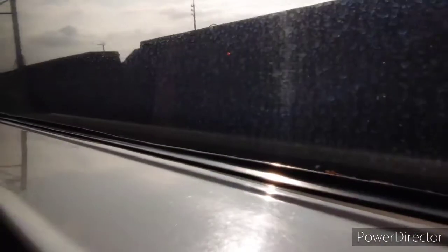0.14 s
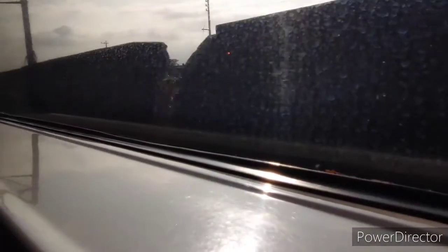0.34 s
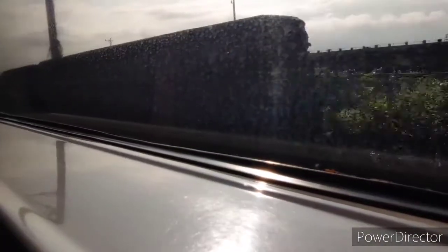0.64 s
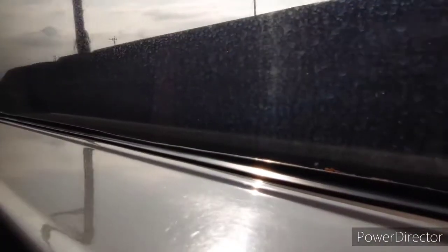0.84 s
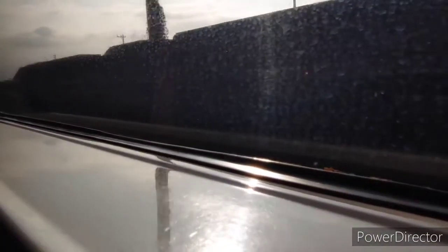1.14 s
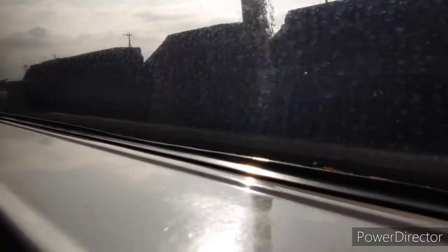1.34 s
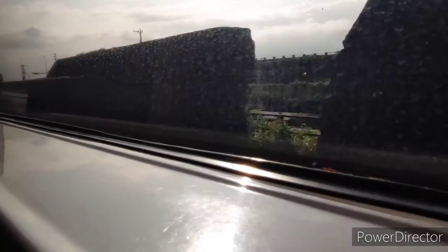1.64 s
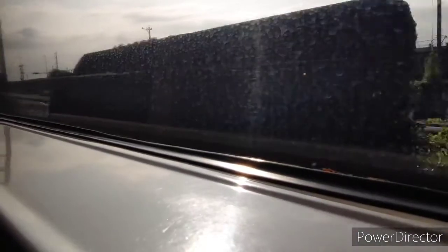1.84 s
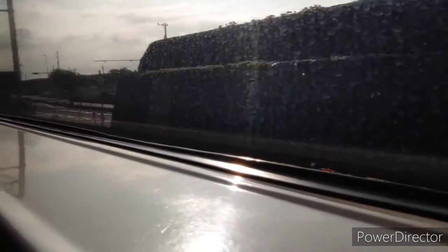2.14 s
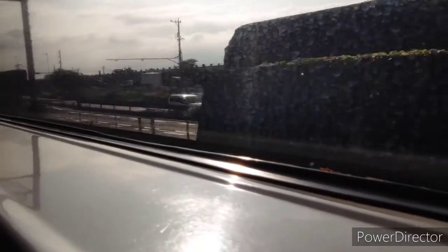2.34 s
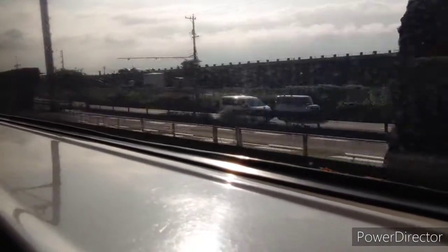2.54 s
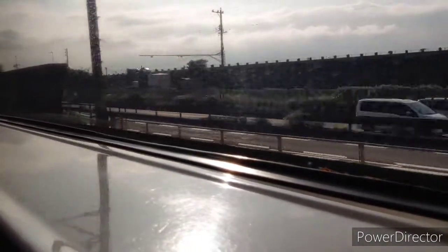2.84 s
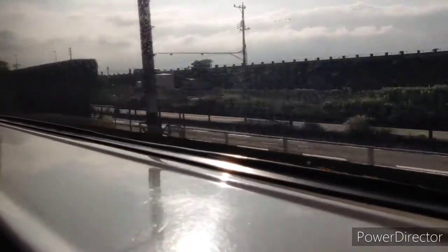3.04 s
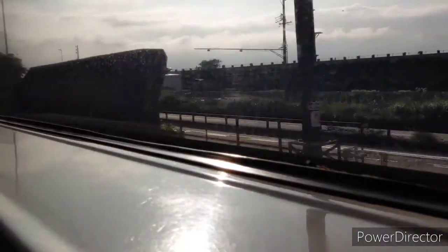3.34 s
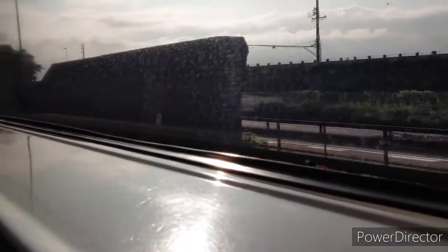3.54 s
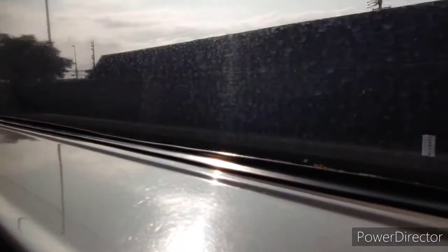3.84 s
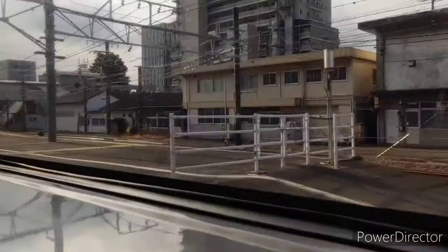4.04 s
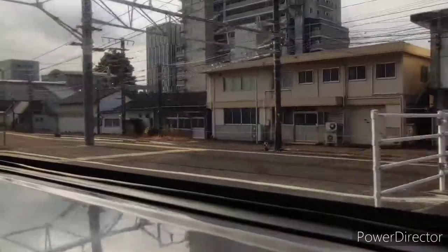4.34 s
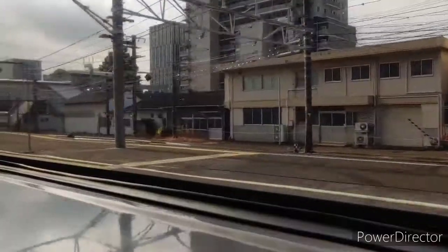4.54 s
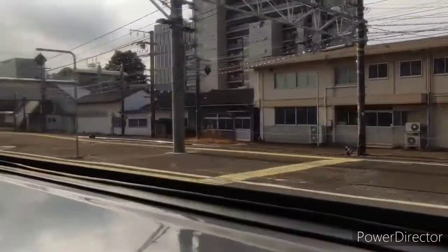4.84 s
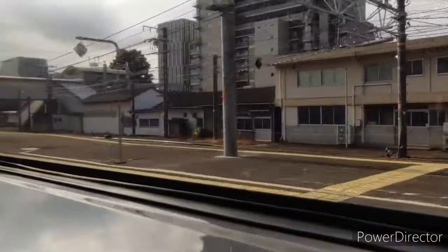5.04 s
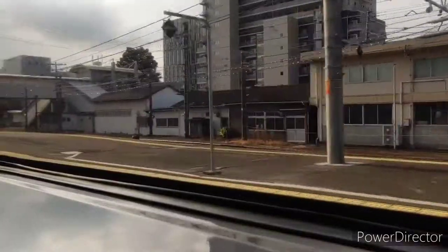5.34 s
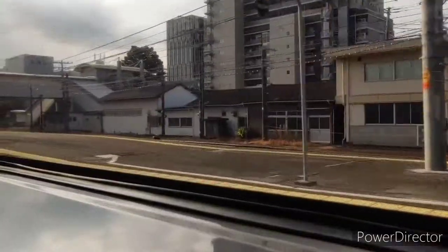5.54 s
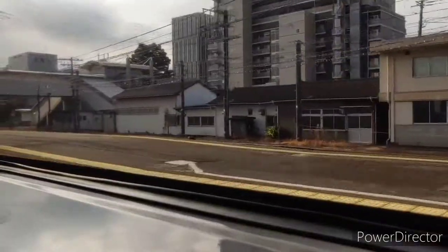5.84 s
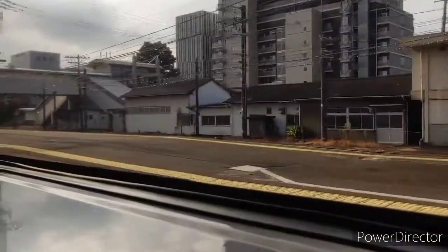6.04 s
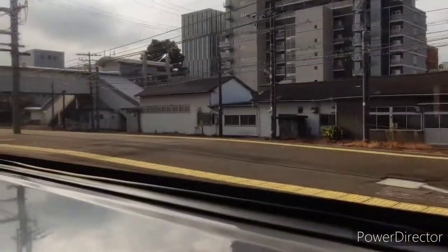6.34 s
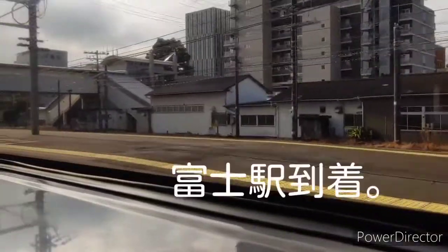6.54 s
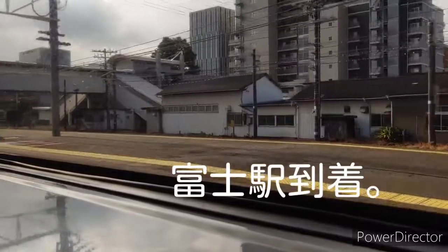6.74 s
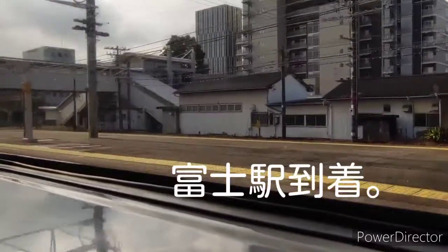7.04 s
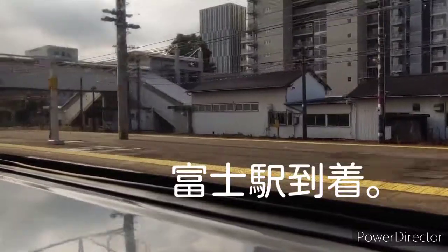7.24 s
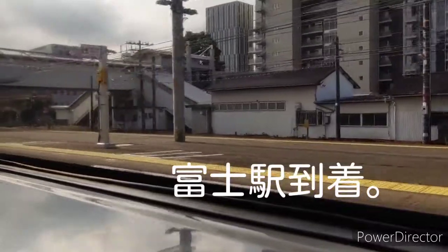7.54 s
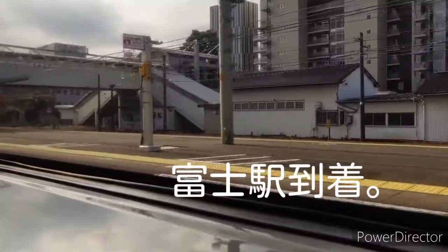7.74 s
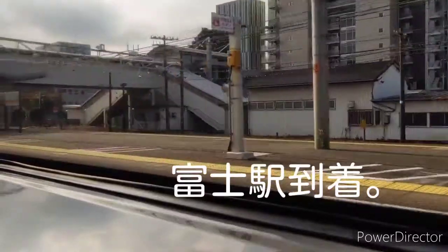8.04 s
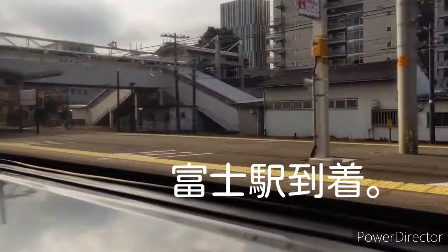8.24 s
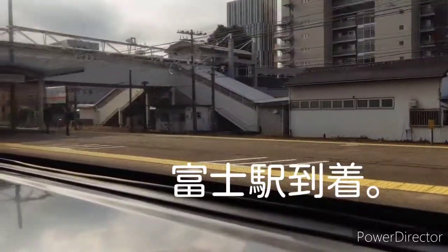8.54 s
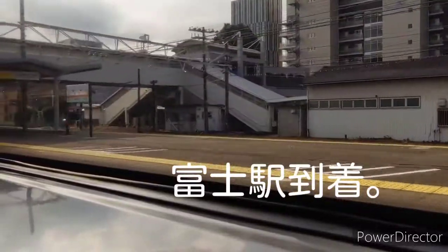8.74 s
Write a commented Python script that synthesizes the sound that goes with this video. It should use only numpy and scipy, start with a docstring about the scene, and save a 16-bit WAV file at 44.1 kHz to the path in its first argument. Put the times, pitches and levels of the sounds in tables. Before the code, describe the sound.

A microphone by a train window picks up heavy bass-rich rolling noise at speed, swelling and dipping past walls, with irregular soft rail-joint thumps and an early gust of hiss. A hard cut leaves a blink of silence. Then a calmer, slowing train rises, with low rumble, layered electric whine gliding downward and swelling unevenly, and a few faint bumps until the end.

```python
"""Inside a carriage of an electric train, a phone by the window. At speed, shaped noise makes the floor
rumble, rail roar and air hiss, narrow resonances the hums and a brief wheel ring, decaying sines the
thuds and ticks, and a gliding tone with fuzz one squeak. After a hard cut and a moment of silence the
braking train fades in; its gear and motor tones are sines that sink with the speed, swelling wherever
they cross a resonance of the carriage body."""
import sys
import numpy as np
from scipy import signal
from scipy.io import wavfile
from scipy.ndimage import uniform_filter1d

SR = 44100
rng = np.random.default_rng(int(sys.argv[2]) if len(sys.argv) > 2 else 0)


def ratio(d):
    """dB to gain"""
    e = np.asarray(d, float) / 20
    return 10 ** e


def put_to_file(sound):
    """Save the sound as 16-bit audio at rate SR, in the file named by the first command-line argument."""
    columns = np.atleast_2d(sound).T  # one column per channel
    safe = np.clip(columns, -1, 1)
    whole_steps = np.round(safe * 32767)
    wavfile.write(sys.argv[1], SR, whole_steps.astype(np.int16))


N = 391605
T = np.arange(N) / SR
CUT_S, FADE_START_S = 4.0405, 4.105  # end of the fast part, start of the braking part


def evened(x):
    """Scales to rms 1."""
    return x / np.sqrt(np.mean(x ** 2) + 1e-20)


def read(points, hz):
    """Reads a spectrum on a log frequency axis."""
    f, value = np.transpose(points)
    return np.interp(np.log(hz + 1), np.log(f + 1), value)


def panned(x, db):
    """Left and right channels, the left db above the right, their mean unchanged."""
    return np.array([x * ratio(db), x]) * 2 / (1 + ratio(db))


def split(x, hz):
    """The parts below and above hz."""
    low = signal.sosfiltfilt(signal.butter(2, hz, fs=SR, output="sos"), x)
    return low, x - low


def follow(level, share):
    """The surges of a level about its median, scaled in dB by share."""
    return (level / np.median(level)) ** share


def resonate(x, hz, width):
    """A one-pole resonance: shifts hz down to zero, smooths, and shifts back."""
    turn = np.exp(2j * np.pi * np.cumsum(hz * np.ones(len(x))) / SR)
    r = np.exp(-np.pi * width / SR)
    return 2 * (turn * signal.lfilter([1 - r], [1, -r], x / turn)).real


def fuzz_band(count, hz, width):
    """Noise through the same resonance twice: a narrow fuzzy band of rms 1."""
    once = resonate(rng.standard_normal(count), hz, width)
    return evened(resonate(once, hz, width))


def fade(t, power):
    """Sets in faintly, then after a soft start rises as a power of the time, fast at first."""
    first_step, soft_start_s, full_s = .08, 0.092, 2.4
    u = np.maximum(t - FADE_START_S, .004)
    return np.minimum(u / full_s, 1) ** power * (1 - (1 - first_step) * np.exp(-u / soft_start_s))


# likeness of the two channels: (f/Hz, left-right correlation)
LIKENESS = [(60, 0.98), (80, 1), (110, 1), (140, 0.98), (190, 1), (260, 0.94), (340, 0.74), (460, 1),
            (610, 0.89), (820, 0.39), (1100, -0.58), (1470, -0.16), (1960, 0.078), (2620, 0.045),
            (3510, -0.077), (4690, 0.05), (6270, -0.072), (8390, -0.085), (11200, -0.42), (15000, 0.2)]
# phase by which the left port leads: (f/Hz, phase/rad)
LEFT_LEAD = [(100, 0), (300, 0.44), (700, 0.31), (1100, 0.033)]
# colour of the left port against the right: (f/Hz, level/dB)
PORT_COLOUR = [(60, 1.5), (200, -1), (350, -0.5), (700, -7), (1100, -10.5), (1600, -4), (2400, 3.5),
               (3400, -1.5), (5000, 1.5), (6000, 1.5), (6700, 22.5), (7300, 2), (8500, 0.5)]


def noise(colour, patchy_db, flicker_db, count, size):
    """Stereo noise with drifting patches and a flicker shared by all pitches; channel mean at rms 1."""
    frames, hz = count * 4 // size + 5, np.fft.rfftfreq(size, 1 / SR)
    a, b, c, d, patches = rng.standard_normal((frames, len(hz), 5)).T
    patches = uniform_filter1d(patches, size=9, axis=0)
    patches = evened(uniform_filter1d(patches, size=9, axis=1))
    flicker = evened(uniform_filter1d(rng.standard_normal(frames), size=7))
    same = np.clip(read(LIKENESS, hz), -1, 1)[:, None]
    shared, own = a + 1j * b, c + 1j * d
    left = shared * np.exp(1j * read(LEFT_LEAD, hz))[:, None]
    right = same * shared + np.sqrt(1 - same ** 2) * own
    ports = panned(ratio(read(colour, hz)), read(PORT_COLOUR, hz))[:, :, None]
    z = np.array([left, right]) * ports * ratio(patchy_db * patches + flicker_db * flicker)
    out = signal.istft(z, nperseg=size, noverlap=size * 3 // 4)[1][:, :count]
    return out / out.mean(0).std()


def floor_rumble(level, colour, deep_share):
    """Low noise through the floor; the deep bass follows only its own share of the surges."""
    deep, floor = split(noise(colour, patchy_db=0.44, flicker_db=1.0, count=len(level), size=2048), hz=85)
    return level * floor + deep * np.median(level) * follow(level, deep_share)


# the roar brightens beside the walls: (t/s, level of its upper middle/dB)
BRIGHTENING = [(0, 0), (.6, 0), (1.0, 0), (1.6, 0), (2.2, 0), (2.6, 1.5), (3.0, 3), (3.3, 2.5), (3.5, 0),
               (4.03, 0)]


def rail_roar(level, colour, share, flicker_db, t):
    """Mid-range rolling noise; its top edge follows only its own share of the surges."""
    roar = noise(colour, patchy_db=0.96, flicker_db=flicker_db, count=len(t), size=1024)
    body, edge = split(roar, hz=1390)
    dull, bright = split(body, hz=600)
    body = dull + bright * ratio(np.interp(t, *np.transpose(BRIGHTENING), right=0))
    return level * body + edge * np.median(level) * follow(level, share)


# the sinking speed: (t/s, gear mesh f/Hz)
GEAR_MESH = [(4.1, 320.4), (5.5, 295.2), (6.1, 285.4), (6.7, 273), (7.2, 265.2), (7.8, 255), (8.3, 246.4),
             (8.88, 237)]
# tones tied to the speed: (multiple of the gear mesh)
MESH_MULTIPLES = [1, 1.281, 1.45, 2, 2.565, 2.92, 3.01, 3.26, 3.845, 3.932, 4.015, 5.015, 6.03]
# one row a multiple, before body and fade: (settled level/dB, settling t/s, level before relative to it/dB)
TONE_LEVELS = [(0, 4.2, 0), (-8, 7.5, 8), (-4, 8.3, -17), (0, 4.2, 0), (-11, 4.2, 0), (-8, 6.8, -4),
               (-7, 8.5, -5), (0, 5.6, -9), (-14, 6.3, 10), (3, 7.6, -11), (-5, 6.8, -3), (-2, 6.8, -9),
               (-3, 4.2, 0)]
# resonances of floor and walls: (f/Hz)
BODY_PITCHES = [238, 243.5, 253.5, 267.5, 274, 283, 290, 312, 354.5, 365, 377, 391, 403, 605, 722, 755, 778,
                808, 840, 868, 920, 962, 1000, 1040, 1082, 1126, 1168, 1192, 1222, 1300, 1356, 1647, 1815]
# one row a resonance: (width/Hz, level/dB)
BODY_PEAKS = [(7, -24), (8.5, -21), (9, -24.5), (5.5, -23.5), (8.5, -24.5), (10, -25), (8, -28.5),
              (16, -42), (12, -36), (10, -35), (10, -32), (10, -40), (12, -37), (40, -48), (16, -35),
              (14, -38), (24, -39.5), (24, -45), (14, -39.5), (20, -40), (26, -48), (22, -46), (34, -44),
              (30, -49), (30, -42), (20, -48), (20, -54), (12, -50), (16, -54), (18, -55), (14, -52),
              (24, -54), (26, -59)]
# response between the resonances: (f/Hz, level/dB)
BODY_FLOOR = [(240, -44), (500, -50), (900, -55), (1600, -66)]


def whine():
    """Clean, separately wavering sines on multiples of the gear mesh swell at each body resonance."""
    settle_s, waver_db, fade_power, pan_db = 0.71, 1.4, 0.33, -5
    start = round(GEAR_MESH[0][0] * SR)
    t, out = T[start:], np.zeros((2, N))
    turn = 2 * np.pi * np.cumsum(np.interp(t, *np.transpose(GEAR_MESH))) / SR
    slow = t[::200]  # levels are worked out on a coarse time grid
    mesh_hz = np.interp(slow, *np.transpose(GEAR_MESH))
    steps = np.arange(t[0], t[-1] + .1, .04)
    chance = rng.standard_normal((len(MESH_MULTIPLES), len(steps)))
    for multiple, (full_db, full_s, before_db), row in zip(MESH_MULTIPLES, TONE_LEVELS, chance):
        hz = multiple * mesh_hz
        tone_db = full_db + before_db * np.clip((full_s - slow) / settle_s, 0, 1)
        power = ratio(read(BODY_FLOOR, hz)) ** 2
        for peak_hz, (width, db) in zip(BODY_PITCHES, BODY_PEAKS):
            power = power + (ratio(db) / (1 + (2 * (hz - peak_hz) / width) ** 4)) ** 2
        waver = waver_db * np.interp(slow, steps, row)
        level = np.sqrt(power) * ratio(tone_db + waver) * fade(slow, fade_power)
        sine = np.sqrt(2) * np.sin(multiple * turn + 2 * np.pi * rng.random())
        out[:, start:] += panned(np.interp(t, slow, level) * sine, read(PORT_COLOUR, hz.mean()) + pan_db)
    return out


# wheels over rail joints: (t/s, level before rise and decay/dB, ring f/Hz)
JOINT_THUDS = [(0.025, -5.5, 198), (0.061, -4.5, 138.4), (0.172, -8.5, 169), (.31, -9.5, 191.5),
               (0.469, -5, 191), (0.476, -6.5, 472), (0.496, -10.5, 171), (0.6, -11.5, 203.6),
               (.61, -11.5, 385), (0.711, -14, 150), (0.959, -8.5, 143), (1.024, -14.5, 165),
               (1.798, -12.5, 636), (1.805, -6.5, 150.7), (1.879, -13.5, 658), (1.889, -14.5, 174),
               (1.929, -13, 210), (1.99, -16.5, 510), (2.187, -14.5, 627), (2.235, -6.5, 174),
               (2.275, -4.5, 216), (2.316, -8, 168), (2.705, -5, 175), (2.74, -11, 166.5),
               (2.855, -10.5, 177.4), (2.89, -8.5, 167.4), (3.03, -13, 616), (3.058, -12.5, 146),
               (3.105, -17, 201), (3.299, -9.5, 186.5), (3.351, -11, 167), (6.129, -17.5, 174),
               (6.352, -11, 130.5), (6.358, -19, 309), (4.81, -29.5, 470), (8.379, -26, 605)]


def thuds():
    """A soft blow rings the floor for roughly a tenth of a second, shorter when high."""
    rise_cycles = 2.24
    out, t = np.zeros(N + SR), np.arange(SR // 5) / SR
    for s, db, hz in JOINT_THUDS:
        rise = np.sin(np.pi / 2 * np.minimum(t * hz / rise_cycles, 1)) ** 2
        ring = np.sin(2 * np.pi * (hz * t + rng.random()))
        ring += 0.12 * np.sin(2 * np.pi * (1.37 * hz * t + rng.random()))
        t60 = 0.051 + 20.3 / (hz + 120)  # seconds
        out[round(s * SR):][:len(t)] += ratio(db - 60 * t / t60) * rise * ring
    return panned(out[:N], -.8)


# loose trim ticking: (t/s, crack level/dB, left-right level/dB, knock level/dB)
TRIM_TICKS = [(1.1373, -21.5, -8, -9), (2.2373, -20, -10, -11), (4.1662, -55, 3, -50), (4.287, -55, 0, -50),
              (4.795, -57, 7, -50)]
# rings of the crack: (f/Hz, relative level/dB, t60/s)
CRACK_MODES = [(2300, -0.5, .005), (3400, -7.5, .006), (4440, 6.5, 0.0035), (5500, 0.5, 0.0052),
               (7300, -0.5, 0.0033), (9250, -3, .003), (12500, 5.5, .006), (15000, -9, .003)]


def ticks():
    """The panel gives way with a dull knock, then snaps: short rings and scattered near reflections."""
    knock_hz, knock_lead_s, knock_t60_s = 260, .0019, .012
    out, t = np.zeros((2, N)), np.arange(SR // 40) / SR
    ring = sum(ratio(db - 60 * t / t60) * np.sin(2 * np.pi * hz * t) for hz, db, t60 in CRACK_MODES)
    ring = ring * np.minimum(t / .0003, 1) / abs(ring).max()
    knock_decay = ratio(-60 * np.maximum(t - knock_lead_s, 0) / knock_t60_s)
    knock = knock_decay * np.sin(2 * np.pi * knock_hz * t)
    for s, db, pan_db, knock_db in TRIM_TICKS:
        sparse = rng.random(len(t)) < .08
        echoes = ratio(-19.0 - 60 * t / .025) * rng.standard_normal(len(t)) * sparse
        crack = ring + np.convolve(echoes, ring)[:len(t)]
        out[:, round(s * SR):][:, :len(t)] += panned(ratio(db) * crack, pan_db)
        out[:, round((s - knock_lead_s) * SR):][:, :len(t)] += ratio(knock_db) * knock
    return out


# a rubber joint squeaking: (t/s, slip rate f/Hz, grip level/dB)
RUBBER_SQUEAK = [(2.665, 3340, -62), (2.69, 3385, -45), (2.76, 3375, -45), (2.80, 3370, -47.5),
                 (2.835, 3340, -49), (2.89, 3350, -61)]


def squeak():
    """Fast uneven slips: a tone with rough skirts, and a rougher octave that the left port favours."""
    s, hz, db = np.transpose(RUBBER_SQUEAK)
    part = slice(round(s[0] * SR), round(s[-1] * SR))
    hz, grip = np.interp(T[part], s, hz), ratio(np.interp(T[part], s, db))
    tone = np.sin(2 * np.pi * np.cumsum(hz) / SR)
    skirts = fuzz_band(len(hz), hz, width=160)
    octave = fuzz_band(len(hz), 2 * hz, width=320)
    out = np.zeros((2, N))
    out[:, part] = panned(grip * (tone + .8 * skirts), -12.0)
    out[:, part] += panned(ratio(-2.5) * grip * octave, 17.0)
    return out


# a wheel sings briefly: f/Hz, width/Hz, level/dB, middle t/s, spread t/s
WHEEL_SONG = (1860, 50, -46, 3.15, .13)


def wheel_ring():
    """A fuzzy narrow ring that swells and fades along a bell curve."""
    hz, width, db, middle, spread = WHEEL_SONG
    swell = np.exp(-.5 * ((T - middle) / spread) ** 2)
    return panned(ratio(db) * swell * fuzz_band(N, hz, width), 4.0)


def steady_hums(hums, surges, t):
    """Wheels and equipment hum: wavering sines with fuzz that is stronger in the wider ones."""
    out = np.zeros((2, len(t)))
    steps = np.arange(t[0], t[-1] + .1, .08)
    for hz, width, db, pan_db, growth_db, waver_db in hums:
        sine = np.sin(2 * np.pi * (hz * t + rng.random()))
        hum = .06 * width * fuzz_band(len(t), hz, width) + sine
        waver = ratio(waver_db * np.interp(t, steps, rng.standard_normal(len(steps))))
        growth = ratio(db + growth_db * (t - t.mean()))
        out += panned(growth * evened(hum * waver) * surges, pan_db)
    return out


def air_hiss(low_level, high_level, low_colour, high_colour, count):
    """Air along the window: a low and a high band of noise, the high one patchier."""
    low = noise(low_colour, patchy_db=1.0, flicker_db=0.5, count=count, size=512)
    high = noise(high_colour, patchy_db=2.0, flicker_db=0.0, count=count, size=512)
    return low_level * low + high_level * high


def carriage(levels, colours, hums, share, deep_share, roar_flicker_db, t):
    """Sums rumble, roar, hiss and hums; the hums follow a share of the roar's surges."""
    rumble, roar, low_hiss, high_hiss = levels
    out = floor_rumble(rumble, colours[0], deep_share)
    out += rail_roar(roar, colours[1], share, roar_flicker_db, t)
    out += air_hiss(low_hiss, high_hiss, colours[2], colours[3], len(t))
    return out + steady_hums(hums, follow(roar, share), t)


# surging with track and passing walls: (t/s, floor rumble level/dB, rail roar level/dB)
FAST_SURGES = [(0, -17.5, -21.5), (.12, -16.5, -21), (.25, -20, -24.5), (.45, -17, -21.5), (.62, -19, -21),
               (.75, -18.5, -24.5), (.88, -22.5, -27), (1.0, -17.5, -22), (1.3, -20.5, -25.5),
               (1.62, -23.5, -24), (1.75, -22.5, -25.5), (1.88, -20, -22.5), (2.08, -21.5, -24),
               (2.28, -16.5, -22), (2.62, -24.5, -23), (2.75, -21.5, -21.5), (2.88, -22.5, -22),
               (3.05, -18, -22), (3.25, -25.5, -22.5), (3.38, -20.5, -25), (3.52, -23.5, -29),
               (3.75, -18, -27), (3.9, -25, -27.5), (4.03, -22, -27.5)]
# gusts of air along the window: (t/s, high hiss level/dB)
GUSTS = [(0, -64.5), (.2, -61), (.45, -54.5), (.76, -58.5), (.88, -64.5), (1.0, -67), (1.22, -65.5),
         (1.39, -61), (1.62, -69), (2.05, -66), (2.25, -68), (2.5, -67.5), (2.9, -66.5), (3.3, -69),
         (3.62, -68), (4.03, -66)]


def fast_levels(t):
    """Gains of rumble, roar, low hiss and high hiss at speed; the low hiss follows half the gusts."""
    s, rumble_db, roar_db = np.transpose(FAST_SURGES)
    high_db = np.interp(t, *np.transpose(GUSTS))
    low_db = -58 + 0.51 * (high_db - np.median(high_db))
    return ratio(np.interp(t, s, rumble_db)), ratio(np.interp(t, s, roar_db)), ratio(low_db), ratio(high_db)


# rumble, roar, low hiss and high hiss, one spectrum each: (f/Hz, relative level per Hz/dB)
FAST_SPECTRA = ([(12, -36), (20, -5.5), (54, -5), (92, -5.5), (140, 0.5), (171, -4.5), (209, -0.5),
                (287, -7), (330, -20.5), (430, -37), (730, -120)], [(180, -37.5), (300, -2.5), (328, -1),
                (404, -0.5), (539, -2), (622, 1), (750, -4.5), (1000, -4), (1420, -15.5), (2470, -19.5),
                (2980, -27), (3440, -30), (4200, -48.5), (5460, -64), (9240, -120)], [(2120, -31),
                (3600, -7.5), (4280, -3), (5630, -6.5), (6580, -2), (6920, -3.5), (7600, -20.5),
                (9880, -48), (16700, -120)], [(4470, -40.5), (7600, -12), (8470, 0.5), (9580, -1),
                (10600, -4.5), (11100, -25.5), (11900, -0.5), (12600, 0.5), (14500, -3.5), (15600, -10.5)])
# hums: (f/Hz, width/Hz, level midway before surges/dB, left-right level/dB, growth/dB per s, wavering/dB)
HUMS_AT_SPEED = [(58.56, 5.6, -34, 2.5, 0.5, 1), (148.2, 17, -35.5, 0.5, 1.5, 1),
                 (415.5, 2.7, -36.5, -2.5, 2.2, 1.5), (797, 11, -43.5, -12.5, 0, 3),
                 (1836, 45, -55, 5.5, 0, 3), (2394, 30, -53, 2.5, 0.5, 3.5)]


def fast_part(t):
    """The carriage at speed, its layers surging."""
    return carriage(fast_levels(t), FAST_SPECTRA, HUMS_AT_SPEED, share=0.3, deep_share=0.25,
                    roar_flicker_db=0.6, t=t)


# rumble, roar, low hiss and high hiss, one spectrum each: (f/Hz, relative level per Hz/dB)
BRAKING_SPECTRA = ([(12, -41), (20, -8.5), (49, 4.5), (97, -4), (145, 2), (229, -3), (274, -6.5),
                   (330, -26), (430, -41.5), (730, -120)], [(180, -22.5), (300, -8), (321, -4.5),
                   (370, 1.5), (437, -8.5), (510, -2.5), (563, -6.5), (810, -7.5), (1070, -12),
                   (1230, -12.5), (1360, -19), (2240, -23.5), (4200, -39), (5460, -73), (9240, -120)],
                   [(2120, -35), (3600, -13.5), (5110, -3.5), (6030, -4.5), (6640, 2.5), (7160, -5),
                   (7600, -17.5), (9880, -51), (16700, -120)], [(4470, -28.5), (7600, -8.5), (8620, 1.5),
                   (9550, 0), (10400, -7.5), (11200, -17.5), (11700, -5.5), (12400, 0.5), (14700, -3.5),
                   (15600, -7.5)])
# hums: (f/Hz, width/Hz, level midway before the fade/dB, left-right level/dB, growth/dB per s, wavering/dB)
HUMS_BRAKING = [(58.6, 7, -37, -1, .1, 1), (119.8, 3.7, -40.5, 0, .1, 1), (149.2, 21, -34.5, 0, 0.41, 1),
                (274.5, 3, -41.5, 3, .1, 1), (514, 12, -48, -4, .1, 3), (713, 14, -53, -6.5, 1, 3)]
# rumble, roar, low hiss, high hiss: (full level/dB, power of the fade)
BRAKING_FADES = [(-26.5, 0.32), (-35, 0.3), (-63, 0.39), (-72, 0.32)]


def braking_part(t):
    """The braking carriage and its whine fade in, the deepest bass coming up later still."""
    levels = [ratio(db) * fade(t, power) for db, power in BRAKING_FADES]
    out = carriage(levels, BRAKING_SPECTRA, HUMS_BRAKING, share=1.18, deep_share=0.95,
                   roar_flicker_db=0.17, t=t)
    out += whine()[:, -len(t):]
    deep, rest = split(out, hz=100)
    return rest + deep * (1 - np.exp(-(t - t[0]) / .12))


def scene():
    """The fast part stops dead; after a short silence the braking part rises."""
    cut, start = round(CUT_S * SR), round(FADE_START_S * SR)
    out = squeak()
    out[:, :cut] += fast_part(T[:cut])
    out *= np.clip((CUT_S - T) / .0004, 0, 1)
    out[:, start:] = braking_part(T[start:])
    return out + thuds() + ticks() + wheel_ring()


def roll_off(x):
    """The treble ends steeply here."""
    return signal.sosfilt(signal.butter(12, 15720, fs=SR, output="sos"), x)


def record(dry):
    """Closes the mix with a very short fade to silence."""
    mix = dry * np.clip((T[-1] - T) / 0.0046, 0, 1)
    return roll_off(mix)


dry = scene()
out = record(dry)
put_to_file(out)
```